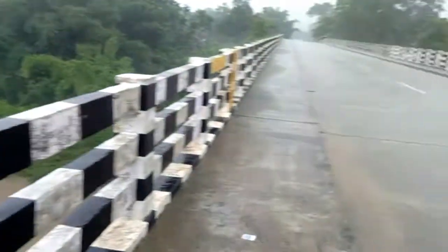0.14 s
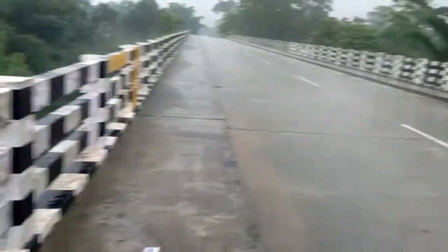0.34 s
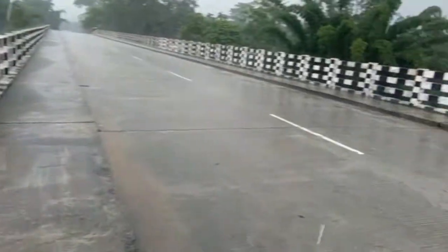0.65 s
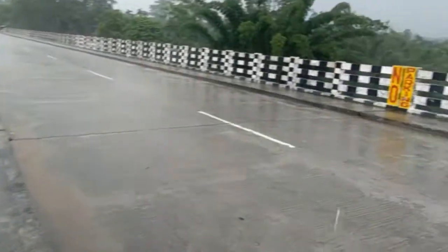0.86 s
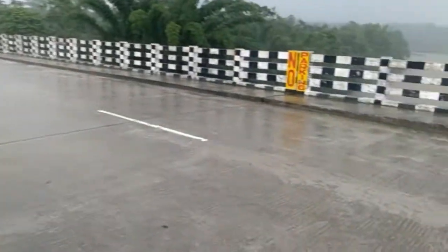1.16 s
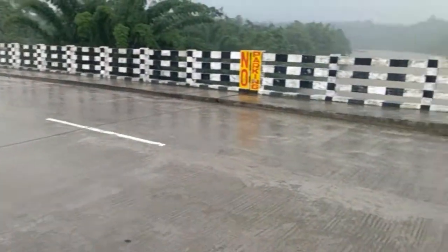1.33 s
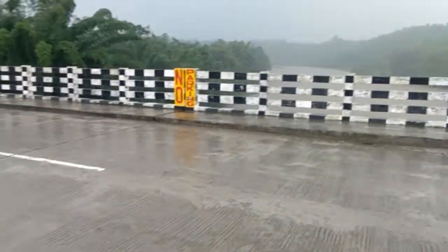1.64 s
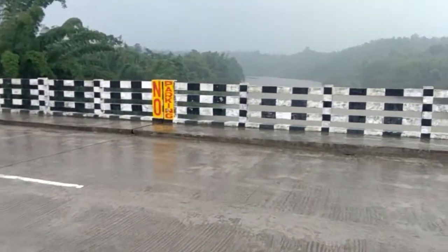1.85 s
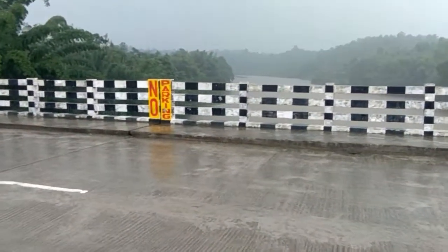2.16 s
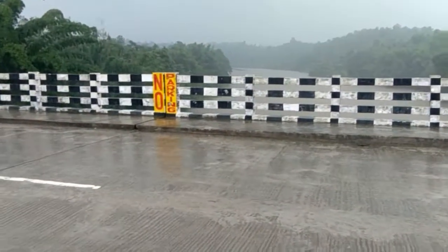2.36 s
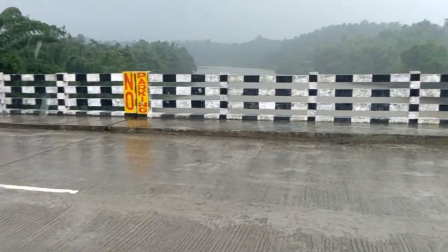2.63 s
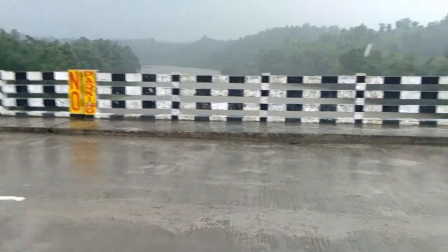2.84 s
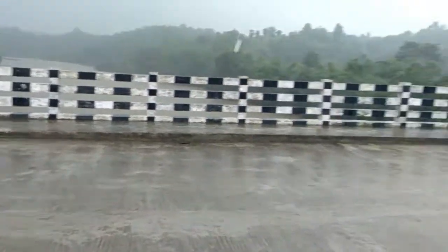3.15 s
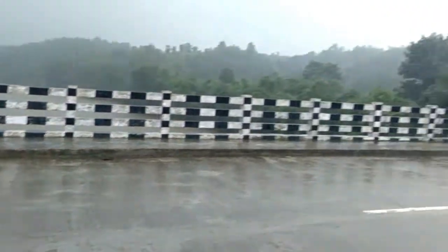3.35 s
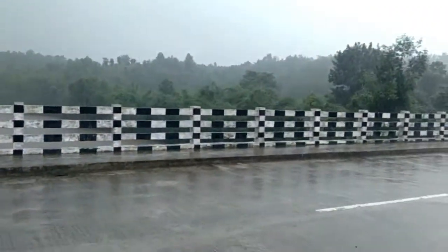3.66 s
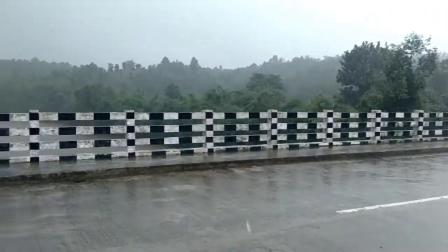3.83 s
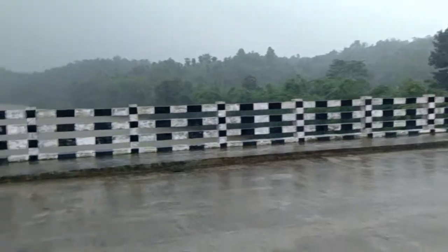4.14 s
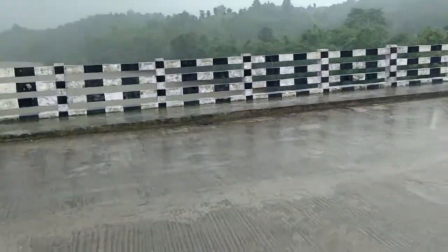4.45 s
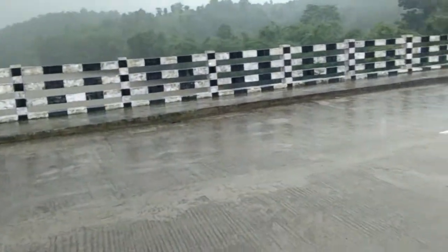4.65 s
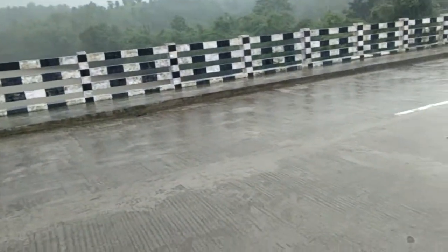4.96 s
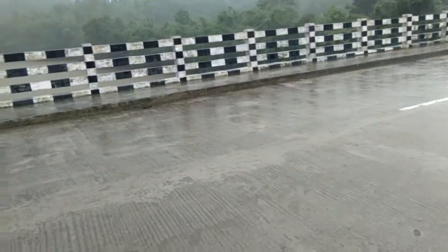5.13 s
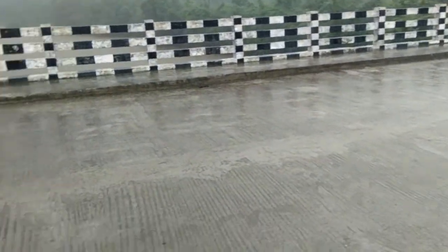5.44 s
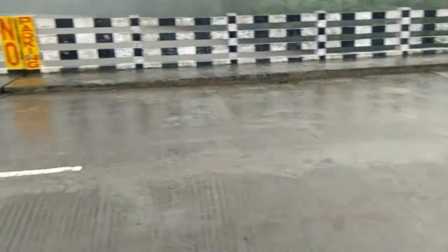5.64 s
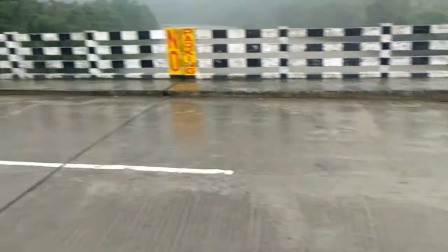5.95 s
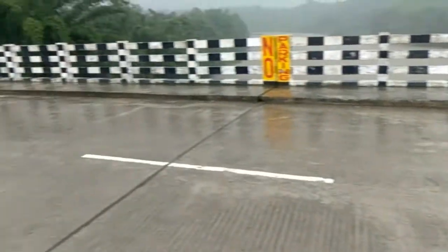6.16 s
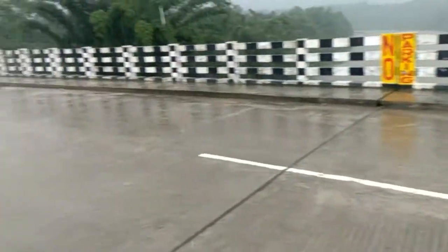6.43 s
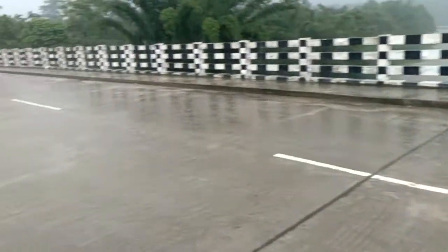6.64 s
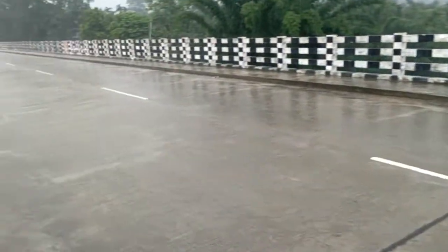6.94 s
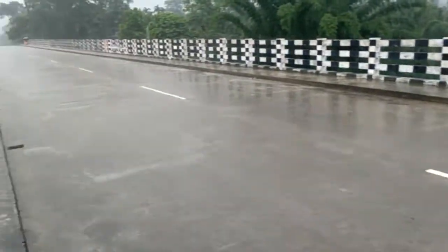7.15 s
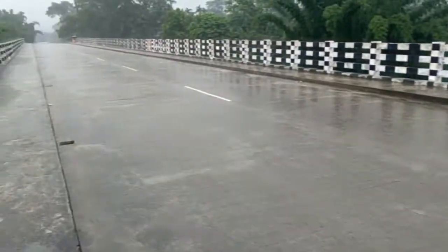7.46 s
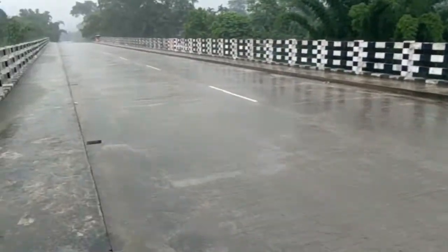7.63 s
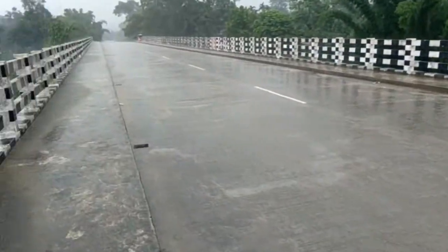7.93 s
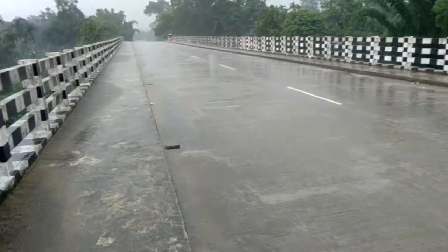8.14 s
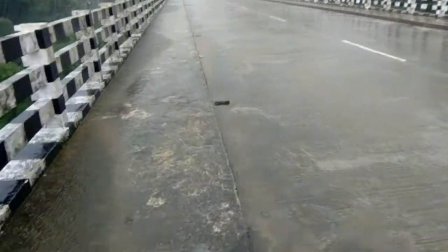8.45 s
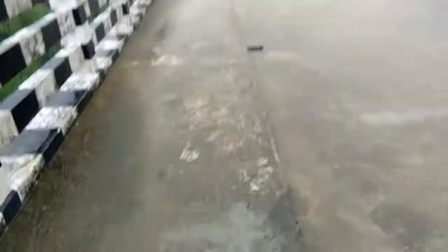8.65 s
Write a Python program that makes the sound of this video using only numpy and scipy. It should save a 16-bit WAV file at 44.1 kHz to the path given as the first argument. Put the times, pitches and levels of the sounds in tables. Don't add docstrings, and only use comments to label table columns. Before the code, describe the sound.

Heavy rain falls throughout on an open concrete bridge, heard close and dry through a handheld phone: a dense, dull, mid-low patter of short ragged splats over smooth distant hiss. For the first second it is mostly rain, with a pair of strong drop plops at 0.4. From about 1.1 wind hits the microphone; hard, low thumps and fluttering bursts crowd 1.3 to 2.8, the loudest near 1.35 and 2.27, the rain dipping briefly after the latter. Buffets continue to 3.8, then heavy blows land at 3.9 to 4.2. Lighter flutter follows to 5, then a calmer gap with scattered plops. More thuds come from 5.8 to 7.1, thinning to isolated puffs at 7.4 and 8.16. Brief watery sprays brighten the rain at 4.2, 4.8, 7.6, 7.8 and 8.4. Treble gradually dulls as steady rain continues to the end, near 8.8.

```python
import sys
import numpy as np
from scipy import signal
from scipy.fft import rfft, irfft
from scipy.io import wavfile
from scipy.ndimage import uniform_filter1d, minimum_filter1d

SR = 44100
rng = np.random.default_rng(int(sys.argv[2]) if len(sys.argv) > 2 else 0)


def gain_from_db(level_db):
    decades = np.asarray(level_db, float) / 20
    return 10 ** decades


def generate_wav(sig):
    pcm = np.round(np.clip(np.atleast_2d(sig).T, -1, 1) * 32767).astype(np.int16)
    wavfile.write(sys.argv[1], SR, pcm)


N = 387638
CLOCK_SAMPLES = 32

# frequency in Hz, density in dB per Hz.
AIR_SPECTRUM = [(2000, -30), (6000, -3), (10000, -2), (16500, -2)]
# time in seconds, level in dB.
BREEZE_LEVEL = [
    (0.0, -31),
    (1.17, -31),
    (1.56, -36),
    (2.89, -29.5),
    (3.77, -27),
    (3.99, -32),
    (5.39, -36),
    (6.09, -23.5),
    (6.29, -36),
    (8.79, -33.5),
]
# start in seconds, length in seconds, level in dB, brightness in dB.
LONG_GUSTS = [(1.277, 0.044, -16.5, -12), (1.329, 0.057, -16.5, -0.5), (1.416, 0.11, -24, -20),
              (1.543, 0.047, -17, -9), (1.588, 0.062, -13, 1), (1.652, 0.118, -15.5, -3.5),
              (1.813, 0.33, -20, -12), (2.15, 0.087, -17, -17), (2.254, 0.046, -19.5, 3),
              (2.333, .13, -17.5, -1.5), (2.49, 0.095, -16.5, -11), (2.737, .3, -19.5, -11),
              (3.075, 0.11, -20, -22), (3.247, 0.059, -20.5, -11), (3.923, 0.066, -12, -4),
              (4.02, .06, -21.5, -6), (4.101, 0.072, -10, -7.5), (4.175, 0.074, -15.5, -9),
              (4.645, 0.078, -20, -1), (4.698, 0.15, -20, -2.5), (4.834, 0.063, -25, 0.5),
              (4.93, 0.19, -34, 2.5), (5.823, 0.03, -21, -2), (5.892, 0.038, -20, -8),
              (5.959, 0.057, -17.5, -4.5), (6.037, 0.071, -17.5, -11), (6.447, 0.18, -27.5, -15),
              (7.277, 0.076, -19, -25), (7.368, 0.04, -25, -14), (7.43, 0.049, -28, -5),
              (8.18, 0.081, -29.5, -20)]
# middle in seconds, level in dB, brightness in dB.
SHORT_BUFFETS = [(1.07, -18.5, -3), (2.69, -18.5, -23), (3.17, -21, -20), (3.37, -19.5, -20),
                 (3.55, -13, -25), (3.65, -24.5, -22), (3.71, -20.5, -4), (3.78, -20, -28),
                 (3.83, -24, -12), (4.33, -20, -6), (4.43, -25, -20), (4.57, -29, -2), (6.228, -19.5, -24),
                 (6.3, -30, -22), (6.37, -21.5, -8), (6.53, -18.5, -16), (6.83, -23, -18),
                 (6.919, -19, -16), (7.05, -21.5, -19), (7.75, -22.5, -19), (8.159, -20, -12),
                 (8.79, -25, -16), (6.6, -31, -15), (8.02, -26, -16), (3.46, -24, -20), (0.95, -30, -16)]
# frequency in Hz, density in dB per Hz.
BUFFET_SPECTRUM = [(25, -44), (45, -4.5), (80, 4.5), (140, 3.5), (250, -8), (400, -13), (700, -53.5),
                   (3000, -110)]
# frequency in Hz, density in dB per Hz.
FLUTTER_SPECTRUM = [(120, -22.5), (200, 0.5), (350, 6.5), (600, -4.5), (900, -14.5), (1500, -43.5),
                    (5000, -110)]
# time in seconds, peak in dB, pitch in Hz.
PORT_PUFFS = [(1.0731, -15, 232), (1.2878, -7, 285), (1.3456, -0.5, 254), (1.3811, -10, 202),
              (1.5633, -2.3, 304), (1.6005, -4, 190), (1.6341, -4, 294), (1.6929, -2, 262), (1.72, -8, 220),
              (1.9844, -5, 208), (2.1726, -3, 189), (2.2695, 4, 332), (2.5016, -14, 176),
              (2.5219, -5.8, 251), (2.5463, -3, 190), (2.7914, -10.5, 205), (2.9953, -6.5, 190),
              (3.2766, -8, 252), (3.5619, -10.5, 233), (3.9564, -2, 263), (3.9787, 3, 180),
              (4.132, -1, 258), (4.1661, -7, 267), (5.8558, -10.5, 276), (5.9095, -5.5, 168),
              (6.0656, -9, 131), (6.2327, -9, 146), (6.9204, -12.5, 221), (7.4, -13.5, 174),
              (8.161, -7.5, 291)]
# time in seconds, peak in dB, pitch in Hz.
PHONE_SPLASHES = [(1.5825, -38.8, 7811), (1.8048, -38, 11092), (2.7213, -39.2, 9220), (2.7254, -41.0, 8460),
                  (2.7571, -37.7, 7770), (2.8289, -41.1, 7750), (3.8897, -40.2, 9255),
                  (4.3272, -42.1, 7751), (4.414, -44.0, 7623), (5.5388, -43.4, 7830), (5.9793, -44.5, 9013),
                  (6.0613, -43.7, 7908), (6.1705, -41.2, 8894), (6.2328, -42.1, 7573),
                  (6.5906, -41.8, 8115), (7.1315, -44.0, 8093), (7.2564, -43.8, 7818),
                  (7.2916, -43.9, 7519), (7.3239, -44.8, 10867), (7.5942, -42.0, 7296), (7.6174, -47, 8263),
                  (7.6217, -34.9, 9081), (8.2709, -44, 9164), (8.3106, -39, 13200), (8.3943, -43.5, 7751),
                  (8.4559, -49, 7793), (8.5258, -46.0, 10151), (8.5789, -45.3, 8190), (8.7644, -46.7, 8826),
                  (8.7761, -44, 8672)]
# time in seconds, peak in dB, pitch in Hz.
LARGE_DROPS = [(0.4071, -11.7, 1367), (0.4193, -4, 1350), (1.6923, -3, 1053), (1.9161, -10.7, 1333),
               (2.3797, -6, 1272), (2.3915, -9, 1259), (2.5549, -6.5, 928), (2.8571, -6, 1233),
               (2.9121, -7, 1455), (3.1364, -6.5, 1248), (3.2163, -6, 1384), (3.2609, -7, 1520),
               (3.4017, -8, 1350), (3.4427, -20, 1325), (3.4815, -17, 1284), (3.5415, -7, 1240),
               (3.6148, -24, 1317), (3.7351, -7, 1295), (4.32, -5, 1421), (4.3944, -6.5, 1388),
               (5.295, -8.5, 1220), (5.3198, -19, 1529), (5.3589, -17, 1337), (5.4172, -13.9, 1206),
               (5.5676, -4.5, 1108), (6.38, -9, 1278), (6.9063, -30, 1291), (7.1069, -10, 1245),
               (7.6905, -6, 1420), (8.0078, -6.5, 1166)]
# time in seconds, rain level in dB, treble shading in dB.
RAIN_LEVEL = [(0.0, -28, -21), (0.46, -28, -22), (1.56, -28, -23), (1.61, -31, -25), (1.84, -25.5, -25.5),
              (2.32, -29, -23), (2.37, -28, -23.5), (2.81, -27, -28.5), (3.84, -29.5, -27),
              (4.18, -28.5, -31.5), (5.07, -32, -28.5), (6.0, -28.5, -33.5), (7.51, -30.5, -34),
              (7.61, -31, -26), (7.66, -30, -36), (8.79, -31, -38)]
# frequency in Hz, density in dB per Hz.
PATTER_SPECTRUM = [(40, -10), (100, -14.5), (300, -2.5), (600, -1.5), (1000, 0.5), (1800, -2),
                   (2300, -11.5), (4000, -24.5), (8000, -89.5), (14000, -100)]
# frequency in Hz, density in dB per Hz.
SPRAY_SPECTRUM = [(1000, -25.5), (1900, -3.5), (2400, -1), (4000, -5), (5000, -12.5), (6300, -24),
                  (8500, -37.5), (15500, -43)]
# frequency in Hz, density in dB per Hz.
FIZZ_SPECTRUM = [(3500, -5), (4800, 7.5), (5800, 7.5), (6200, 2), (7000, 2.5), (8300, -1.5), (9000, -6),
                 (12300, -13), (13000, -14), (14500, -16), (16500, -14)]
# frequency in Hz, density in dB per Hz.
TICK_SPECTRUM = [(3000, -30), (6000, 11), (9000, -1), (12000, -14), (16500, -10)]
# start in seconds, depth in dB.
GAIN_DUCKS = [
    (1.59, 0),
    (2.17, 4.5),
    (2.27, 3.5),
]
# middle in seconds, width in seconds, spray in dB, fizz in dB.
WATER_FLINGS = [
    (4.21, 0.024, 5, 4),
    (4.8, 0.037, 6.5, -1),
    (7.61, 0.015, -2, 9),
    (7.8, 0.033, 5.5, 0),
    (8.4, 0.018, 7, 5),
]


def evened(x):
    return x / np.sqrt(np.mean(x ** 2) + 1e-20)


def steadied(x, window_s):
    power = uniform_filter1d(x ** 2, size=round(window_s * SR))
    return evened(x / np.sqrt(abs(power) + 0.051))


def curves(rows):
    times_s, *columns = np.transpose(rows)
    return [np.interp(np.arange(N) / SR, times_s, column) for column in columns]


def swell(start_s, length_s, rise_s, fall_s):
    t = np.arange(0, N + CLOCK_SAMPLES, CLOCK_SAMPLES) / SR - start_s
    before = np.minimum(t, 0) / rise_s
    after = np.maximum(t - length_s, 0) / fall_s
    return np.exp(-before ** 2 - after ** 2)


def fine(coarse):
    return np.interp(np.arange(N), np.arange(len(coarse)) * CLOCK_SAMPLES, coarse)


def wander(hz):
    spectrum = rfft(rng.standard_normal(N))
    return evened(irfft(spectrum / (1 + (np.fft.rfftfreq(N, 1 / SR) / hz) ** 2), N))


def coloured(x, spectrum):
    size = 8192
    hz, db = np.transpose(spectrum)
    grid_hz = abs(np.fft.fftfreq(size, 1 / SR))
    gain_db = np.interp(np.log(grid_hz + 1), np.log([*hz, SR]), [*db, -120], left=-70)
    log_gain = np.log(gain_from_db(gain_db))
    phase = -signal.hilbert(log_gain).imag
    taps = np.fft.ifft(np.exp(log_gain + 1j * phase)).real
    taps = (taps * np.fft.fftshift(np.hanning(size)))[:size // 2]
    return evened(signal.oaconvolve(x, taps)[:N])


def scattered(count, db, spread_db, low_hz, high_hz):
    when, size, pitch = rng.random((count, 3)).T
    times_s = 0.05 + when * N / SR * 0.99
    return np.transpose([times_s, db - spread_db * size, low_hz * (high_hz / low_hz) ** pitch])


def strike(events, rise, fall, edge, trim_db, loose=1):
    out = np.zeros(N + SR)
    for (s, db, hz), phase in zip(events, rng.random(len(events))):
        cycles = np.arange(-3 * rise, 3 * fall, hz / SR)
        turn = 2 * np.pi * (cycles + loose * (phase - 0.5))
        shape = np.exp(-(cycles / np.where(cycles < 0, rise, fall)) ** 2)
        wave = np.cos(turn) + edge * shape * np.cos(2.26 * turn)
        first = round(s * SR - 3 * rise * SR / hz)
        out[first:][:len(cycles)] += gain_from_db(db + trim_db) * shape * wave
    return out[:N]


def air_hiss():
    return coloured(rng.standard_normal(N), AIR_SPECTRUM) * gain_from_db(-78)


def wind_levels():
    rise_s, fall_s, buffet_s = 0.013, 0.017, 0.019
    breeze = gain_from_db(curves(BREEZE_LEVEL)[0] - 2.5)
    blows = [(swell(s + rise_s, length - rise_s, rise_s, fall_s), db, bright)
             for s, length, db, bright in LONG_GUSTS]
    blows += [(swell(s, 0, buffet_s, buffet_s), db, bright) for s, db, bright in SHORT_BUFFETS]
    low_power = fine(sum((e * gain_from_db(db)) ** 2 for e, db, _ in blows))
    high_power = fine(sum((e * gain_from_db(db + bright)) ** 2 for e, db, bright in blows))
    low = np.sqrt(breeze ** 2 + low_power)
    high = np.sqrt((breeze * gain_from_db(-6)) ** 2 + high_power)
    return low, high


def wind_eddies(low, high):
    eddies = rng.standard_normal(N)
    buffet = steadied(coloured(eddies, BUFFET_SPECTRUM), window_s=0.052)
    flutter = steadied(coloured(eddies, FLUTTER_SPECTRUM), window_s=0.15)
    buffet *= low * gain_from_db(-3.0 + 2.45 * wander(hz=32.4))
    flutter *= high * gain_from_db(-5.5 + 3.3 * wander(hz=60))
    return buffet + flutter


def wind_puffs(low):
    small = scattered(count=220, db=7, spread_db=9.5, low_hz=110, high_hz=375)
    small = low * strike(small, rise=0.35, fall=0.65, edge=0.48, trim_db=-1.5, loose=0.41)
    body = strike(PORT_PUFFS, rise=0.69, fall=0.48, edge=0.33, trim_db=-2.5, loose=0.25)
    tips = PORT_PUFFS * np.array([1, 1, 2.8])
    tips = strike(tips, rise=0.3, fall=0.61, edge=0.2, trim_db=-14, loose=0.32)
    return small + body + tips


def wind():
    low, high = wind_levels()
    return wind_eddies(low, high) + wind_puffs(low)


def phone_splashes():
    lesser = scattered(count=40, db=-44, spread_db=5, low_hz=7600, high_hz=9400)
    return strike([*PHONE_SPLASHES, *lesser], rise=0.44, fall=0.7, edge=0.6, trim_db=5.0)


def large_drops():
    lesser = scattered(count=36, db=-15, spread_db=6, low_hz=800, high_hz=1700)
    return strike([*LARGE_DROPS, *lesser], rise=0.3, fall=0.84, edge=0.2, trim_db=-3.3)


def near_drops(per_s, spread_db, splat_s, thud, count):
    size = gain_from_db(spread_db * np.minimum(rng.exponential(1, N), 2.7))
    size *= rng.random(N) < per_s / SR
    kind = rng.integers(0, count, N)
    t = np.arange(400) / SR
    push = rng.standard_normal((count, 1)) * np.exp(-t / 0.00087)
    splats = rng.standard_normal((count, len(t))) * np.exp(-t / splat_s) + thud * push
    return evened(sum(signal.oaconvolve(size * (kind == k), splats[k])[:N] for k in range(count)))


def rain_levels():
    fall_s, back_s = 0.012, 0.06
    sheets = evened(np.gradient(wander(hz=3.5)))
    rain_db, shade_db = curves(RAIN_LEVEL)
    duck_db = fine(sum(db * swell(s + fall_s, 0, fall_s, back_s) for s, db in GAIN_DUCKS))
    flung = [(swell(s, 0, width, width), spray, fizz) for s, width, spray, fizz in WATER_FLINGS]
    spray_fling_db = fine(sum(e * db for e, db, _ in flung))
    fizz_fling_db = fine(sum(e * db for e, _, db in flung))
    patter_db = rain_db - 0.46 * duck_db + 0.75 * sheets - 1.3
    spray_db = rain_db + 0.47 * shade_db - duck_db + spray_fling_db + 0.39 * sheets + 4.5
    fizz_db = rain_db + shade_db - duck_db + fizz_fling_db + 0.65 * sheets + 0.1
    return patter_db, spray_db, fizz_db


def rain():
    near = near_drops(per_s=1100, spread_db=2.1, splat_s=0.00024, thud=0.089, count=24)
    clumps = evened(np.gradient(wander(hz=21)))
    patter_db, spray_db, fizz_db = rain_levels()
    patter = coloured(near + 0.65 * rng.standard_normal(N), PATTER_SPECTRUM)
    spray = coloured(near + 1.52 * rng.standard_normal(N), SPRAY_SPECTRUM)
    fizz = coloured(0.6 * near + rng.standard_normal(N), FIZZ_SPECTRUM)
    patter *= gain_from_db(patter_db + 3.0 + 1.0 * clumps)
    spray *= gain_from_db(spray_db + 0.05 + 0.78 * clumps)
    fizz *= gain_from_db(fizz_db + 3.0 + 0.58 * clumps)
    sharp = np.clip(near, -5.5, 5.5) ** 3
    ticks = coloured(sharp, TICK_SPECTRUM) * gain_from_db(-64.0)
    return patter + spray + fizz + ticks


def scene():
    return (air_hiss() + wind() + phone_splashes() + large_drops() + rain())[None]


def roll_off(x):
    return signal.sosfilt(signal.butter(12, 15500, fs=SR, output="sos"), x)


def record(dry):
    low_cut = signal.butter(2, 52, "high", fs=SR, output="sos")
    dry = signal.sosfilt(low_cut, dry)
    ceiling = 0.71
    room = np.minimum(ceiling / (abs(dry) + 1e-9), 1)
    gain = uniform_filter1d(minimum_filter1d(room, size=133), size=133)
    limited = dry * np.minimum(gain, uniform_filter1d(gain, size=401))
    band_limit = signal.firwin(511, 15500, window=("kaiser", 9), fs=SR)
    mix = signal.oaconvolve(limited, band_limit[None], "same")
    return roll_off(mix)


dry = scene()
out = record(dry)
generate_wav(out)
```